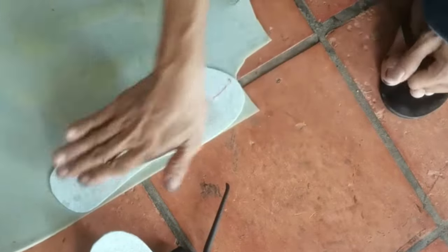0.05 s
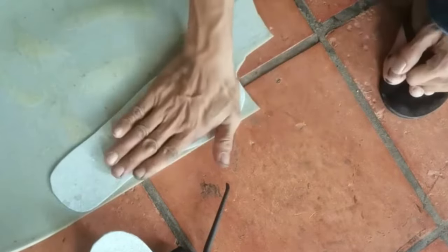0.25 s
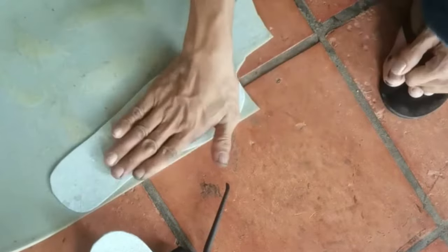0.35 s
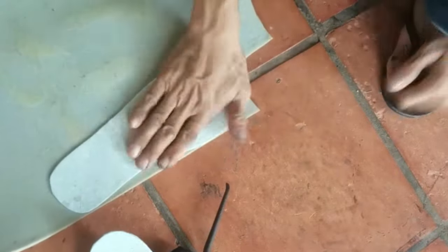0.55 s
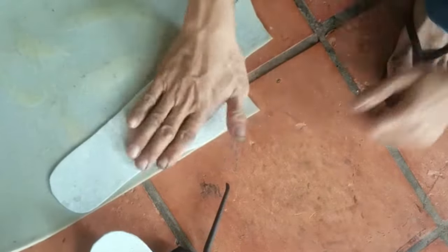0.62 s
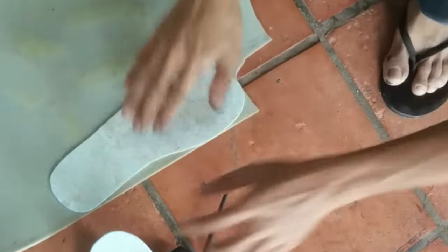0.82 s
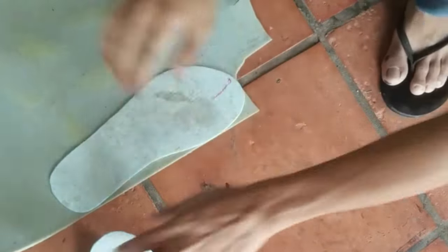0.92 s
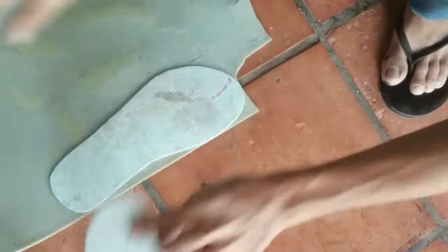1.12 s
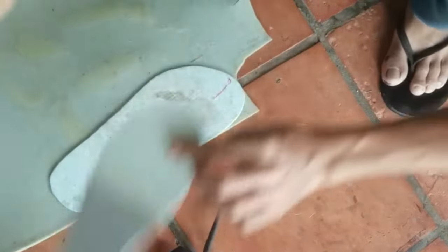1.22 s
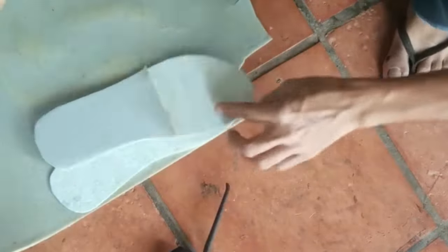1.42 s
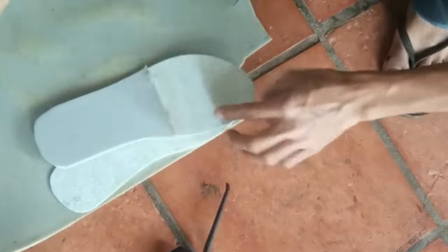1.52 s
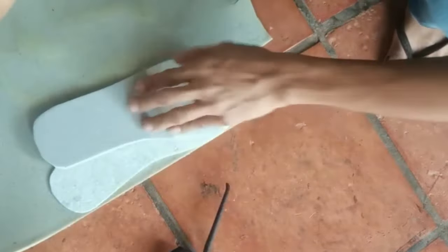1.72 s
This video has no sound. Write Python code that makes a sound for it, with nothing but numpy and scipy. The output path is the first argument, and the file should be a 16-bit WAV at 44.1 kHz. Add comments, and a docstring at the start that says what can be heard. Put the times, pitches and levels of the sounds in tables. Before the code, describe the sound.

Two sharp hand slaps on a shoe insole, followed by another sole flopping down lightly.

```python
"""A hard-walled workshop with a low rumble, heard through a phone's microphone near the tiled floor.
The room is still ringing from a light pat; at 0.2 s and 0.6 s a hand slaps an insole flat onto a sheet,
and the phone's limiter ducks the loudest slap. At 1 s a second sole is picked up with a faint scuff;
at 1.4 s it drops on top of the first. Each contact squeezes out a short pulse of air with a crack of
skin or rubber, a clack and a low thud, and the walls answer."""
import sys
import numpy as np
from scipy import signal
from scipy.fft import rfft, irfft, next_fast_len
from scipy.io import wavfile
from scipy.ndimage import uniform_filter1d, minimum_filter1d

SR = 44100
rng = np.random.default_rng(int(sys.argv[2]) if len(sys.argv) > 2 else 0)


def store_wav(level_fs):
    """Save 16-bit WAV to argv[1]."""
    pcm = np.round(np.clip(np.atleast_2d(level_fs), -1, 1) * 32767)
    wavfile.write(sys.argv[1], SR, pcm.T.astype(np.int16))


N = 77175

# Spectrum of the distant machinery: frequency_hz, relative_db
MACHINERY_SPECTRUM = [(20, -10.5), (45, -5.5), (85, 5.5), (110, -5.5), (133, 2.5), (165, -11), (300, -19),
                      (600, -27.5), (1200, -29.5), (2500, -37.5), (4200, -40.5), (5300, -46.5), (7300, -39),
                      (9000, -46), (11000, -43.5), (15000, -44)]
# The workshop's diffuse decay: frequency_hz, level_db, t60_s, build_s, side_db, pan_db (left minus right)
ROOM_DECAY = [(60, -2, 0.25, .04, -22.5, 6.5), (113, 13.5, 0.24, 0.016, -4.5, 13.5),
              (156.1, -0.5, 0.24, 0.014, -10, 4), (238, 7, 0.26, .03, -13.5, 4),
              (320, 2.5, 0.35, 0.007, -11.5, 3.5), (463, 1.5, 0.26, 0.0031, -11.5, 2.5),
              (910, -4, 0.32, 0.0017, 0, -0.5), (1900, -3, 0.32, .005, 0.5, 2),
              (3800, 0.63, 0.32, .005, 1, 0), (7500, 1.5, 0.33, 0.0026, -2.5, 0.5),
              (15000, -3, 0.18, 0.0017, 8, 8)]
# First reflections to reach the microphone: delay_s, level_db, pan_db
REFLECTIONS = [(.0105, -11.5, 0), (.0128, -21, 2)]
# Standing waves between the walls: pitch_hz, relative_db, t60_s
STANDING_WAVES = [(91, 0.5, .5), (136.4, 0, .9), (215, -2, .3), (269, -14.5, 0.9), (657.6, 1, 0.44),
                  (721, -8, 0.29), (1047, -10, 0.5)]
# Rubber sliding: start_s, rise_s, fall_s, level_db, centre_hz, width_hz
RUBBER_SLIDES = [(1.005, 0.038, 0.12, -61, 3696, 896), (1.046, 0.039, 0.027, -59, 1960, 1150),
                 (1.053, 0.042, 0.03, -55.5, 7500, 3780), (1.436, 0.0065, 0.026, -46, 2540, 1290)]
# Spectrum of a crack of skin or rubber: frequency_hz, relative_db
CRACK_SPECTRUM = [(150, -11), (500, 3.5), (1200, 7), (2000, 3.5), (2800, -2.5), (4000, -2.5), (5000, -10),
                  (7000, -4), (8800, -12), (11000, -7), (13000, -19.5), (16000, -32.5)]
# Hand on the insole, fingers and palm landing apart; clack, crack and thud are relative to the air pulse:
# start_s, level_db, air_hz, ring_ms, clack_db, crack_db, tilt_db_per_octave, thud_db, pan_db, room_db
HAND_SLAPS = [(-0.060, -19, 470, 0.31, 4, 11.5, -0.5, -8.5, -4, 6.5),
              (0.2258, 0, 730, 0.33, -9.5, -7, -2.3, -25, 2, -12.5),
              (0.2279, 6.5, 800, 0.56, -10.5, -0.5, -1.36, -18, 3.5, -1.5),
              (0.2294, -8, 619, 0.89, -9.5, 2, 3.2, -16, -7, -12),
              (0.5606, -18, 720, 0.67, -20, 6.5, -2.8, -12.5, 1, -0.5),
              (0.5639, -2.5, 980, 0.5, -16, -2, 1, -12, 1.5, 2)]
# Second sole, lifted, then landing edge first and flopping flat:
# start_s, level_db, air_hz, ring_ms, clack_db, crack_db, tilt_db_per_octave, thud_db, pan_db, room_db
SOLE_CONTACTS = [(1.0210, -49, 1550, 0.91, -13, -3.5, -1.5, -23, -4, 11.5),
                 (1.0384, -33, 1500, 0.73, -30, -15, 10, -13.5, 0, -9),
                 (1.4375, -19.5, 1160, 0.53, -12.5, -6.5, 0, -11.5, 2.5, 4),
                 (1.4547, -28, 970, 0.51, -1, 1.5, -3.5, -22, -3, -9),
                 (1.4726, -16.5, 623, 0.61, -31, -4, 2, -13.5, 1, -5.5),
                 (1.4759, -26.5, 930, 0.18, -26, 10.5, -5, 2, -11, -8.5)]

LEAD_S = .25  # the scene runs this long before the sound opens
LEAD = int(LEAD_S * SR)
TIME = np.arange(-LEAD, N) / SR
TOP_HZ = 16000
SIDE_SIGN = np.array([[1], [-1]])  # a side signal adds on the left and subtracts on the right


def undb(db):
    """Decibels to gain."""
    return 10 ** (np.asarray(db) / 20)


def pan(db):
    """Left and right gains for a level difference."""
    return undb(SIDE_SIGN * db / 2)


def unit(x):
    """Scale to an average energy of one per channel."""
    return x / np.sqrt(np.mean(np.sum(x ** 2, axis=-1)))


def on_log(hz, points, values):
    """Read a table on a logarithmic frequency axis."""
    return np.interp(np.log(hz + 1), np.log(points), values)


def colour(x, points):
    """Minimum-phase filter through (frequency_hz, gain_db) points."""
    n = 2 * next_fast_len(x.shape[-1])
    gain = undb(on_log(np.fft.rfftfreq(n, 1 / SR), *np.array(points).T))
    cepstrum = irfft(np.log(gain))
    cepstrum[1:n // 2] *= 2
    cepstrum[n // 2 + 1:] = 0
    return irfft(rfft(x, n) * np.exp(rfft(cepstrum)))[..., :x.shape[-1]]


def machinery(level_db=-53, bass_pan_db=8.5, widen_hz=1190):
    """Distant machinery: bass to the left of the microphone, faint hiss all around."""
    hz = np.fft.rfftfreq(len(TIME), 1 / SR)
    mid, side = rfft(colour(rng.standard_normal((2, len(TIME))), MACHINERY_SPECTRUM))
    width = hz / (hz + widen_hz)
    lean = pan(bass_pan_db * (1 - width) ** 2)
    rumble = irfft((mid + SIDE_SIGN * width * side) * lean, len(TIME))
    return undb(level_db) * rumble / rumble.std()


def workshop(send, bands=19, standing_db=-59.5):
    """Hard walls answer: a diffuse decay with the bass building late, reflections and standing waves."""
    t = np.arange(SR) / SR
    hz = np.fft.rfftfreq(SR, 1 / SR)
    points, *columns = np.array(ROOM_DECAY).T
    centres = np.geomspace(points[0] / 2, TOP_HZ, bands)  # half an octave apart
    noise = rfft(rng.standard_normal((2, SR)))
    response = np.zeros((2, SR))
    for centre, weights in zip(centres, np.eye(bands)):
        level_db, t60_s, build_s, side_db, pan_db = (on_log(centre, points, c) for c in columns)
        band = on_log(hz, centres, weights)
        envelope = np.exp(-np.log(1000) * t / t60_s) * (1 - np.exp(-(t / build_s) ** 2))
        mid, side = (unit(v * envelope) for v in irfft(noise * band))
        stereo = unit(mid + undb(side_db) * side * SIDE_SIGN)
        response += undb(level_db) * np.sqrt(np.mean(band ** 2)) * pan(pan_db) * stereo
    for delay_s, level_db, pan_db in REFLECTIONS:
        response[:, int(delay_s * SR)] += undb(level_db) * pan(pan_db)[:, 0]
    for pitch_hz, relative_db, t60_s in STANDING_WAVES:
        wave = np.sin(2 * np.pi * (pitch_hz * t + rng.random())) * np.exp(-np.log(1000) * t / t60_s)
        pan_db = on_log(pitch_hz, points, columns[-1])
        response += undb(standing_db + relative_db) * wave * pan(pan_db)
    return signal.fftconvolve(send[None], response, axes=-1)[:, :len(send)]


def scuffs(roughness=0.66):
    """Grainy hiss that swells and fades as the rubber sole slides."""
    out = np.zeros((2, len(TIME)))
    for start_s, rise_s, fall_s, level_db, centre_hz, width_hz in RUBBER_SLIDES:
        grains = rng.standard_normal(out.shape) * np.exp(roughness * rng.standard_normal(len(TIME)))
        low_hz = np.hypot(centre_hz, width_hz / 2) - width_hz / 2
        edges_hz = [low_hz, min(low_hz + width_hz, TOP_HZ)]
        hiss = signal.sosfilt(signal.butter(2, edges_hz, "band", fs=SR, output="sos"), grains)
        swell = np.clip((TIME - start_s) / rise_s, 0, 1)
        fade = np.exp(-(np.maximum(TIME - start_s - rise_s, 0) / fall_s) ** 2)
        out += undb(level_db) * swell * fade * hiss / hiss.std()
    return out


def crack_bursts(t, tilt_db_per_octave, decay_ms=0.71):
    """Skin or rubber cracks: three unrelated noise bursts of a millisecond or so."""
    age = 1000 * t / decay_ms
    bursts = rng.standard_normal((3, len(t))) * np.sqrt(age) * np.exp(-age)
    gate = np.exp(-(age / 5) ** 4)
    for _ in range(6):  # even out the spectrum while keeping the bursts short
        bursts = irfft(np.exp(1j * np.angle(rfft(bursts))), len(t)) * gate
    return colour(bursts, [(hz, db + tilt_db_per_octave * np.log2(hz)) for hz, db in CRACK_SPECTRUM])


def pressure_pulse(t, hz, ring_ms):
    """A swing or two of pressure that moves no net air, peak one."""
    wave = -np.gradient(t * np.exp(-1000 * t / ring_ms) * np.sin(2 * np.pi * hz * t))
    return wave / np.abs(wave).max()


def radiated(body, crack, t):
    """What leaves for the walls: body and crack add in power, without cancelling each other."""
    body_bins, crack_bins = rfft(body), rfft(crack)
    magnitude = np.hypot(np.abs(body_bins), np.abs(crack_bins))
    phase = np.angle(body_bins + crack_bins)
    return irfft(magnitude * np.exp(1j * phase), len(t)) * (1 - t / t[-1]) ** 2


def add(track, sound, start_s):
    """Mix a sound into a track at a given time."""
    i = int((start_s + LEAD_S) * SR)
    track[..., i:i + sound.shape[-1]] += sound[..., :track.shape[-1] - i]


def slaps(contacts, crack_width=0.21, crack_pan_db=-1):
    """Squeezed-out air, clack, thud and crack of each contact: at the microphone and into the room."""
    direct, send = np.zeros((2, len(TIME))), np.zeros(len(TIME))
    t = np.arange(SR // 20) / SR
    clack = unit(pressure_pulse(t, hz=2682, ring_ms=0.49))  # the stiff sole itself
    thud = unit(pressure_pulse(t, hz=222, ring_ms=0.68))  # the floor sheet under it
    for start_s, level_db, air_hz, ring_ms, clack_db, crack_db, tilt, thud_db, pan_db, room_db in contacts:
        air = pressure_pulse(t, air_hz, ring_ms)
        strength = undb(level_db) * np.linalg.norm(air)
        body = unit(air) + undb(clack_db) * clack + undb(thud_db) * thud
        mid, side, outward = (undb(crack_db) * unit(burst) for burst in crack_bursts(t, tilt))
        crack = np.sqrt(1 - crack_width) * mid + np.sqrt(crack_width) * side * SIDE_SIGN
        add(direct, strength * pan(pan_db) * (body + crack * pan(crack_pan_db)), start_s)
        add(send, strength * undb(room_db) * radiated(body, outward, t), start_s)
    return direct, send


def scene(scuff_room_db=-8.5):
    """At the microphone: hand and soles on the floor, the walls around, machinery far off."""
    direct, send = slaps(HAND_SLAPS + SOLE_CONTACTS)
    sliding = scuffs()
    room = workshop(send + undb(scuff_room_db) * sliding[0])
    return (direct + sliding + room + machinery())[:, LEAD:]


def record(dry, limit_db=-1.5, release_s=0.075, lookahead_s=.001, ceiling=.93):
    """The phone: a look-ahead limiter that recovers slowly, a soft ceiling, then a treble cut-off."""
    t = np.arange(N) / SR
    overshoot = np.log(np.maximum(np.abs(dry).max(axis=0) / undb(limit_db), 1))
    recovery = np.exp(-t / release_s)
    reduction = np.maximum.accumulate(overshoot / recovery) * recovery
    window = int(lookahead_s * SR) + 1
    limited = dry * np.exp(uniform_filter1d(minimum_filter1d(-reduction, window), window))
    rounded = limited / (1 + (limited / ceiling) ** 6) ** (1 / 6)
    return signal.sosfilt(signal.ellip(8, .2, 70, TOP_HZ, fs=SR, output="sos"), rounded)


dry = scene()
out = record(dry)
store_wav(out)
```